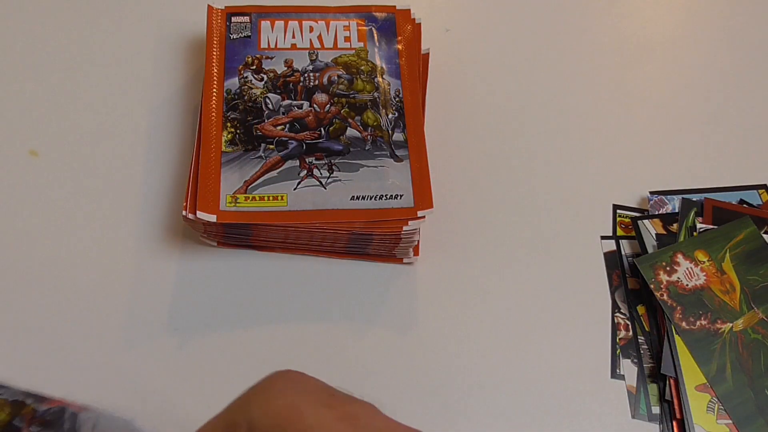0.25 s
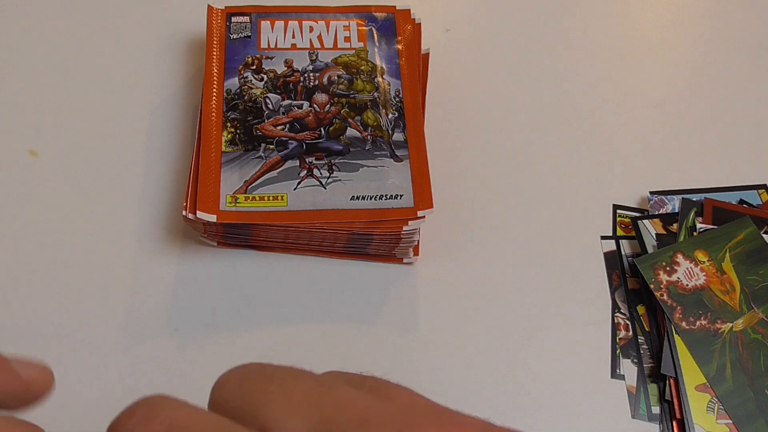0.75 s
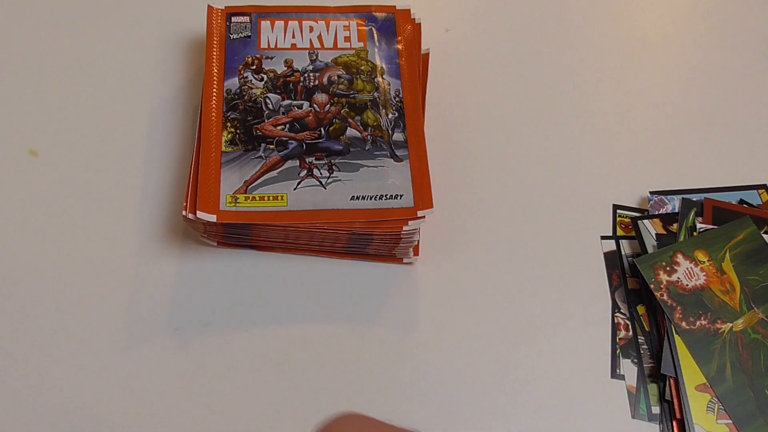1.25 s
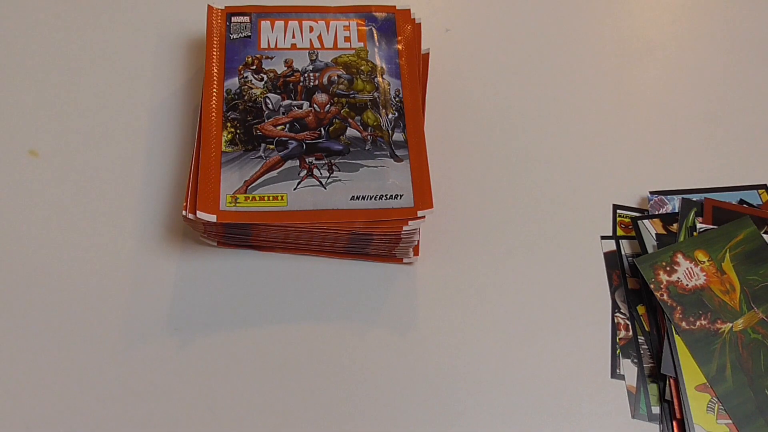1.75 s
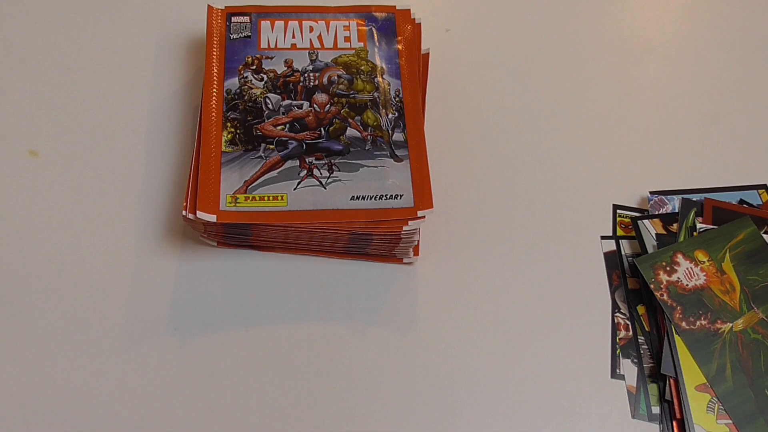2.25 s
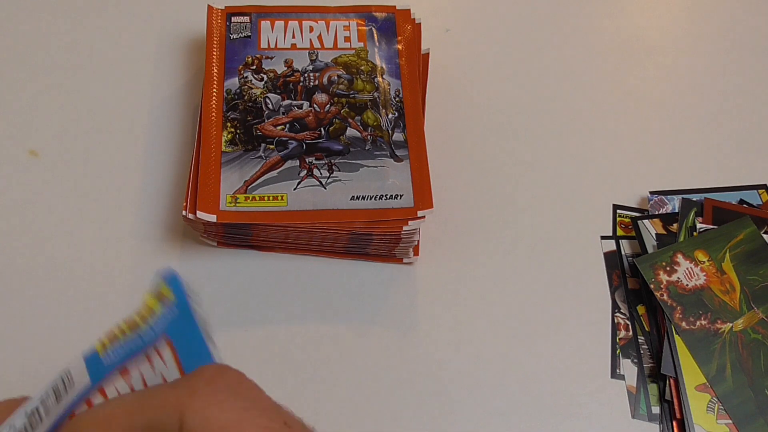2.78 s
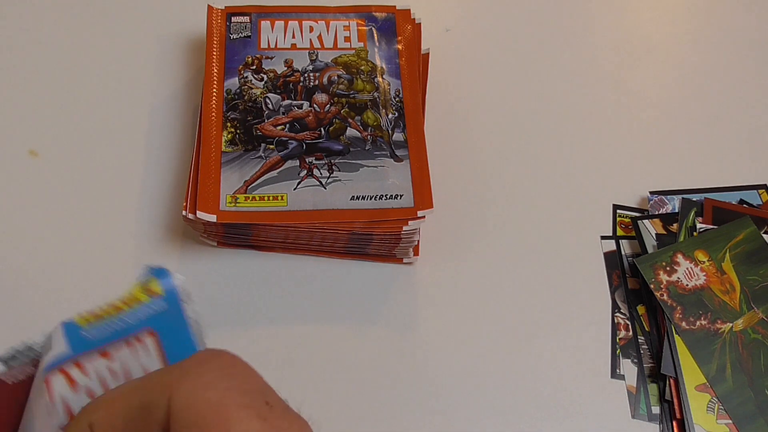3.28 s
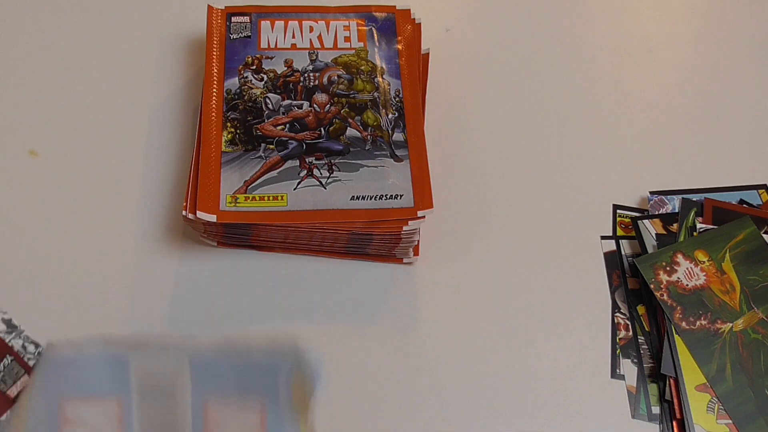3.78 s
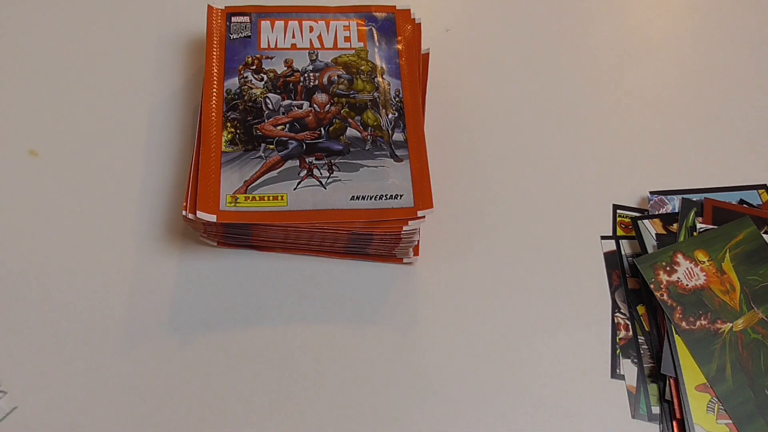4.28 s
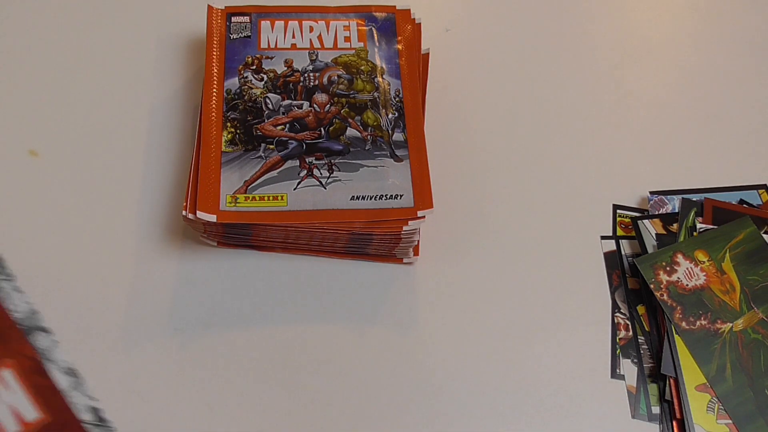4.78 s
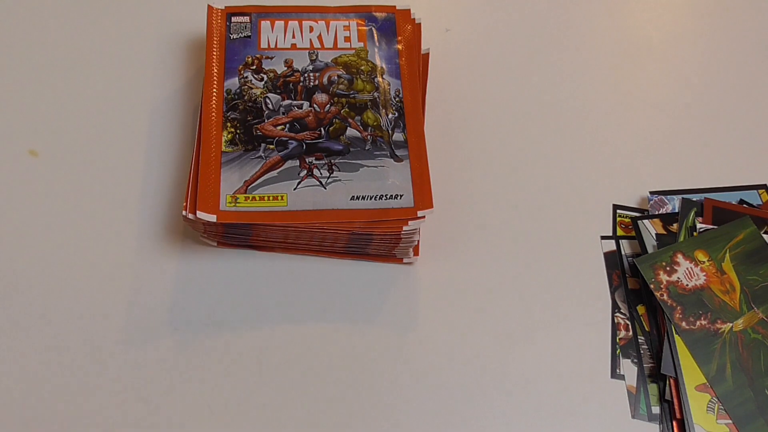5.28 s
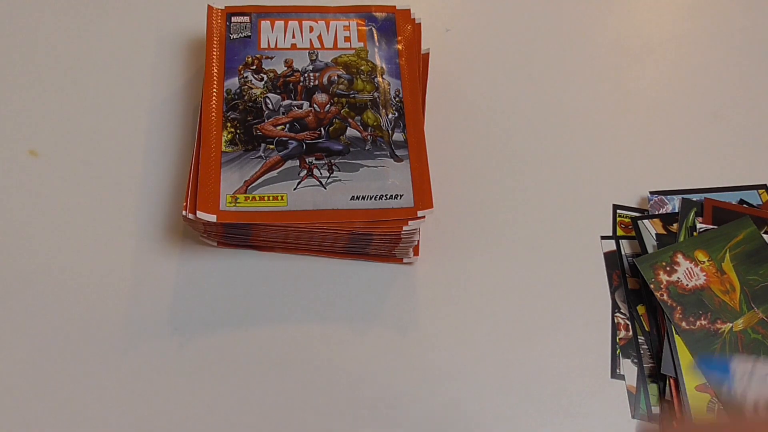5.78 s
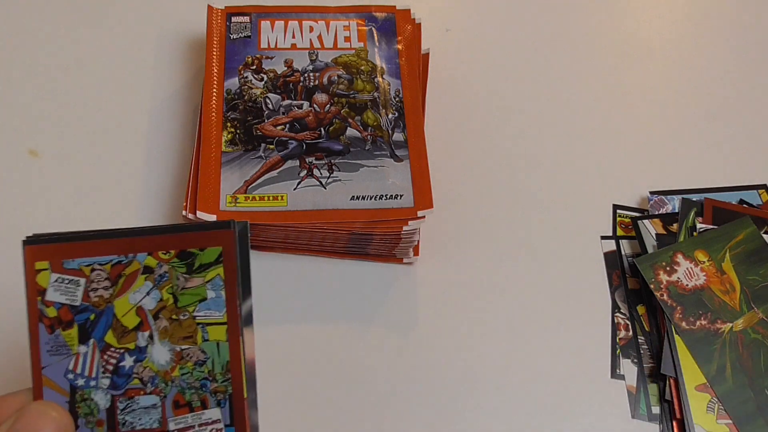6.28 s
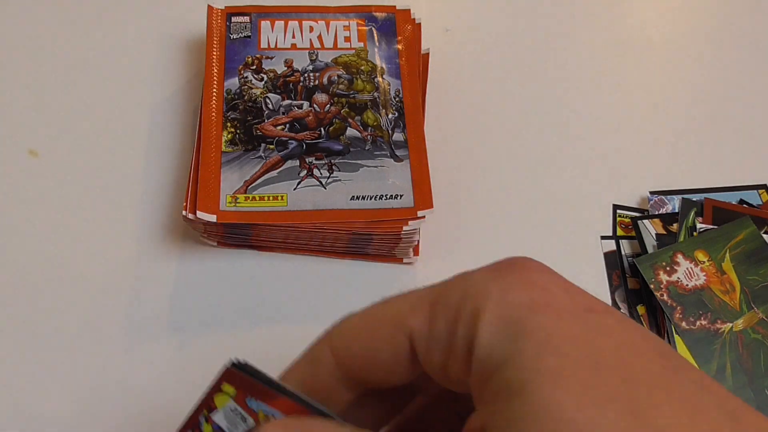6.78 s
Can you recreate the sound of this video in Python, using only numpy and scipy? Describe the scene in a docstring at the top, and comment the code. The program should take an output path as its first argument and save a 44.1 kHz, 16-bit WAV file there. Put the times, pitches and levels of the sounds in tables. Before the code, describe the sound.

Hands at a table open a small paper sticker packet: light rustles and ticks, a bright coarse tear, irregular crackling and small knocks, sharp snapping of the spread wrapper, sliding rubs, one brief stack slap, then dense quiet shuffling. Close stereo camera microphone, short reflection off the table, slight room echo, steady low hiss and rumble.

```python
"""At a table in a small, quiet room, a camera microphone just over the hands: a thin paper sticker packet is
picked up, its top torn off, pried open and unfolded; the stickers are pulled out and the stack is leafed.
Paper sounds as many tiny slips in three layers: fibres fizz, creases ring and the sheet flexes.
Single rips, pops and knocks snap out above them, with a slap of the stack, soft rubs and lone ticks.
Behind lie an echo off the table top, the room's diffuse echoes, and hiss, rumble and a faint hum."""
import sys
import numpy as np
from scipy import signal
from scipy.fft import rfft, irfft
from scipy.io import wavfile
from scipy.ndimage import uniform_filter1d

SR = 44100
rng = np.random.default_rng(int(sys.argv[2]) if len(sys.argv) > 2 else 0)


def log_audio(samples):
    """Write samples as a 16-bit WAV file to the path given in sys.argv[1]."""
    # one column per channel
    frames = np.atleast_2d(samples).T
    # limit to full scale, then quantise
    limited = np.clip(frames, -1, 1)
    pcm = np.round(limited * 32767).astype(np.int16)
    wavfile.write(sys.argv[1], SR, pcm)


N = 310772
FLEX_TOP_HZ, CREASE_TOP_HZ, TOP_HZ = 1700, 6200, 16000  # upper edges of sheet flex, creases and fibres
SNAP_APART = .33  # weight of the side in the noise of snaps and ticks


def undb(db):
    """Decibels to gain."""
    return 10 ** (np.asarray(db) / 20)


def unit(x):
    """Scale to rms 1."""
    return x / np.sqrt(np.mean(x ** 2) + 1e-20)


def decay(t, t60):
    """Exponential fade by 60 dB in t60 seconds."""
    return np.exp(-np.log(1000) * t / t60)


def band(x, lo, hi, order=2):
    """Causal band-pass."""
    sos = signal.butter(order, [lo, min(hi, .48 * SR)], "band", fs=SR, output="sos")
    return signal.sosfilt(sos, x + 1e-18)


def colour_db(colour, hz):
    """Read a spectrum on a log-frequency axis."""
    points, db = np.transpose(colour)
    return np.interp(np.log(hz), np.log(points), db)


def stereo_noise(size, apart):
    """Two noises that share their middle; apart is the weight of the side."""
    mid, side = rng.standard_normal((2, size))
    return unit(np.array([mid + apart * side, mid - apart * side]))


def panned(x, pan_db):
    """Lean a pair of channels to the left."""
    return x * np.array([undb(pan_db / 2), undb(-pan_db / 2)]).reshape(2, -1)


def add(out, s, x):
    """Mix x into out from time s on."""
    start = int(np.clip(s * SR, 0, N - 1))
    out[:, start:start + x.shape[1]] += x[:, :N - start]


def wander(size, rate):
    """Smooth chance with a spread near 1, from rate random knots a second."""
    knots = rng.standard_normal(size=2000)
    return 1.2 * np.interp(np.arange(size) * rate / SR, np.arange(len(knots)), knots)


def steady(x, hold_s=0.13):
    """Even out the power: the hand feeds in energy smoothly, however the slips share it."""
    hold = int(hold_s * SR) + 1
    power = uniform_filter1d(np.mean(x ** 2, axis=0), hold)
    return x / np.sqrt(uniform_filter1d(np.abs(power), hold) + 1e-20)


# Paper merely held stirs faintly. In order: flex, crease and fibre level in dB, before each action's trims.
HELD_PAPER = [-66, -73.5, -74.5]


def effort(action, t, rise_power=0.99, fade_power=1.1):
    """Levels of flex, crease and fibre: strokes swell and fade, adding in power over the stir of held paper."""
    power = np.outer(undb(HELD_PAPER), np.ones(len(t))) ** 2
    for start, rise, fade, db, fizz_db, sheet_db in action:
        swell = np.clip((t - start) / rise, 0, 1) ** rise_power
        # a fade power over 1 holds a moment, then lets go
        swell = swell * 10 ** (-(np.maximum(t - start - rise, 0) / fade) ** fade_power)
        power += np.outer(undb([db + sheet_db, db, db + fizz_db]), swell) ** 2
    return np.sqrt(power)


def crackle(action, colour, rate, spread_db, scatter_db, drift_db, apart, trims_db, pan_db):
    """Random slips (rate a second) of unequal size ring third-octave resonances, which shift as the paper bends."""
    start, rise, fade = np.transpose(action)[:3]
    t = np.arange(start[0], min(np.max(start + rise + 2 * fade), N / SR), 1 / SR)
    slips = np.flatnonzero(rng.random(len(t)) < rate / SR)
    sizes = undb(spread_db * np.minimum(rng.exponential(size=len(slips)), 5))
    sizes = sizes * rng.choice([-1, 1], len(slips))
    layers = np.zeros((3, 2, len(t)))  # flex, crease, fibre
    edges = np.geomspace(115, TOP_HZ, 22)
    for lo, hi in zip(edges, edges[1:]):
        hz = np.sqrt(lo * hi)
        sizes = -sizes  # neighbouring resonances swing in opposite phase
        share, facing = rng.standard_normal((2, len(slips)))
        bend = wander(len(t), rate=28)[slips]
        # every facet of the paper faces the two ports differently
        ports = 1 + apart * np.outer([1, -1], facing)
        pulses = np.zeros((2, len(t)))
        pulses[:, slips] = sizes * undb(scatter_db * share + drift_db * bend) * ports
        layer = np.searchsorted([FLEX_TOP_HZ, CREASE_TOP_HZ], hz)
        layers[layer] += undb(colour_db(colour, hz)) * band(pulses, lo, hi)
    levels = effort(action, t)
    sound = sum(undb(db) * level * steady(layer) for db, level, layer in zip(trims_db, levels, layers))
    out = np.zeros((2, N))
    add(out, start[0], panned(sound, pan_db))
    return out


# Pulls that tear the top off. Each row: start in seconds, rise in seconds, fade by 20 dB in seconds,
# crease level in dB, fibre fizz and sheet flex in dB over that; all levels before the trims.
TEARING_PULLS = [(1.18, 0.075, 0.17, -35, 8, -0.5), (1.295, 0.015, 0.22, -34, 11, -2.5),
                 (1.43, 0.019, 0.14, -36, 15.5, -7), (1.53, .05, 0.15, -38.5, 11, -1.5),
                 (1.611, 0.12, 0.038, -36.5, 7.5, 0.5)]
# Colour of the tear. Each row: frequency in Hz, density in dB per Hz relative within each layer.
TEARING_COLOUR = [(71, -49), (120, -18.5), (355, -14.5), (617, -5), (1010, -10), (1430, -10.5), (1720, -20),
                  (2290, -13.5), (2590, -27), (3450, -13), (5990, -13), (7500, 2.5), (11300, 7),
                  (14700, -7), (16000, -21)]


def tearing():
    """Tearing breaks fibres in a coarse crackle with a strong fizz."""
    return crackle(TEARING_PULLS, TEARING_COLOUR, rate=2400, spread_db=2.5, scatter_db=1.5, drift_db=2.0,
                   apart=0.38, trims_db=[0.5, 0.5, 1.5], pan_db=1.1)


# Tugs that spread the wrapper. Each row: start in seconds, rise in seconds, fade by 20 dB in seconds,
# crease level in dB, fibre fizz and sheet flex in dB over that; all levels before the trims.
UNFOLDING_TUGS = [(3.295, 0.022, .1, -43, 8, -11), (3.335, 0.014, 0.12, -34, -2, -11.5),
                  (3.41, 0.022, 0.1, -46.5, 10.5, -19), (3.478, 0.049, 0.19, -31.5, 4, -6.5),
                  (3.669, 0.014, 0.11, -34, 4.5, -5), (3.69, 0.032, .13, -37, 4.5, 2.5),
                  (3.78, .04, 0.043, -45.5, 2.5, 0)]
# Colour of the spread wrapper. Each row: frequency in Hz, density in dB per Hz relative within each layer.
UNFOLDING_COLOUR = [(71, -38), (120, -8.5), (261, -2.5), (580, -5), (839, -3.5), (1830, -9), (2150, -1.5),
                    (2590, -2.5), (3310, 1.5), (5410, 0.5), (6240, -12), (8310, 2.5), (12300, 3),
                    (14200, -15), (16000, -22)]


def unfolding():
    """Tugs on the folded wrapper make its creases slip."""
    return crackle(UNFOLDING_TUGS, UNFOLDING_COLOUR, rate=2200, spread_db=2.5, scatter_db=4.5, drift_db=2.5,
                   apart=0.39, trims_db=[1.5, 2, 3.0], pan_db=.8)


# The taut packet rings along. Each row: frequency in Hz, width in Hz, gain in dB.
TAUT_PACKET_MODES = [(686, 140, -10.5), (1340, 200, -8), (2220, 140, 2), (3330, 340, -5.5), (4640, 710, -4),
                     (7280, 580, 4.5)]


def packet(x, direct_db=-1.0):
    """Slips heard directly and through the resonances of the stretched packet."""
    out = undb(direct_db) * x
    for hz, width, db in TAUT_PACKET_MODES:
        out = out + undb(db) * band(x, hz - width / 2, hz + width / 2, order=1)
    return out


def catching(rate=110, depth_db=2.15):
    """The paper catches and lets go, so the level of the slips surges and sinks."""
    return unit(undb(depth_db * wander(N, rate)))


# Colour of the wrapper, bent or sliding. Each row: frequency in Hz, density in dB per Hz relative within each layer.
PAPER_COLOUR = [(71, -37), (120, -5.5), (445, 3), (483, 1), (670, 4), (892, -4.5), (1070, 0), (1720, -5),
                (2700, -6.5), (3450, -3), (5870, -4), (6910, -7), (10200, -6), (12500, -6.5), (16000, -34)]
# Bends that pry the packet open. Each row: start in seconds, rise in seconds, fade by 20 dB in seconds,
# crease level in dB, fibre fizz and sheet flex in dB over that; all levels before the trims.
PRYING_BENDS = [(1.75, 0.039, 0.3, -57, 6, -3), (1.87, 0.02, 0.26, -63, 12, 5),
                (2.022, .012, 0.048, -48, 5, -6), (2.05, 0.05, 0.049, -40, 10.5, -5.5),
                (2.13, 0.017, 0.25, -43, 9.5, -4), (2.34, 0.045, 0.092, -46.5, 0.5, 3),
                (2.49, 0.031, 0.1, -45, 2.5, -4.5), (2.665, 0.011, 0.23, -50.5, -2.5, 1),
                (2.77, .085, 0.093, -38, 1.5, -1.5), (2.91, 0.034, .2, -56.5, 6.5, -3),
                (3.06, 0.033, 0.14, -57.5, 3.5, 4), (3.205, 0.0075, 0.19, -55.5, 7.5, -4.5)]


def bending():
    """Bending crackles with fewer slips than sliding paper."""
    return crackle(PRYING_BENDS, PAPER_COLOUR, rate=3800, spread_db=2.5, scatter_db=3.5, drift_db=2.6,
                   apart=0.2, trims_db=[1.0, 0.5, 0.0], pan_db=0)


# Paper sliding on paper and skin. Each row: start in seconds, rise in seconds, fade by 20 dB in seconds,
# crease level in dB, fibre fizz and sheet flex in dB over that; all levels before the trims.
PAPER_SLIDES = [(0, 0.0069, 0.13, -56, 9.5, -0.5), (.08, 0.028, .03, -56, 12.5, 0),
                (.44, 0.048, 0.23, -61.5, 6.5, -1), (.78, 0.0073, 0.09, -52, 2, -2),
                (.945, 0.0073, 0.098, -56, 3, 4.5), (1.11, 0.049, 0.19, -55, 4.5, -4),
                (3.92, 0.029, 0.3, -46, 1, -1.5), (4.065, 0.0092, 0.044, -40, -0.5, 2.5),
                (4.18, 0.025, 0.23, -59, -15, 9.5), (4.316, 0.0087, 0.15, -41.5, 2, -2),
                (4.4, 0.049, 0.037, -45, 5.5, 0), (4.51, 0.025, 0.048, -45, 3.5, -2.5),
                (4.58, 0.02, 0.3, -56.5, 4, -0.5), (4.74, 0.015, 0.073, -57, 3, 0),
                (4.905, 0.042, 0.067, -37, -1.5, -9.5), (5.025, 0.04, 0.043, -50, 9, -1.5),
                (5.09, 0.032, .15, -59.5, 4, 4.5), (5.165, 0.031, 0.26, -50, 0.5, 1.5),
                (5.315, 0.0099, 0.22, -49.5, 6, -1.5), (6.76, .015, 0.18, -55.5, 3, 3.5),
                (6.84, 0.035, 0.21, -61.5, 7.5, 4.5), (6.95, 0.11, 0.08, -59.5, 4, -1)]


def sliding():
    """Sliding makes slips so dense that they hiss."""
    return crackle(PAPER_SLIDES, PAPER_COLOUR, rate=9000, spread_db=3.0, scatter_db=4, drift_db=2.1,
                   apart=0.37, trims_db=[1.0, 0.5, 0.5], pan_db=-0.7)


# Stickers pushed over the stack. Each row: start in seconds, rise in seconds, fade by 20 dB in seconds,
# crease level in dB, fibre fizz and sheet flex in dB over that; all levels before the trims.
LEAFING_PUSHES = [(5.772, 0.03, .04, -57.5, 15.5, 8.5), (5.813, 0.0075, 0.088, -32.5, 3.5, 1.5),
                  (5.87, 0.071, 0.14, -45.5, 5.5, 3.5), (6.04, 0.082, 0.19, -49.5, 7.5, -5),
                  (6.185, 0.056, .04, -52.5, 3, -1), (6.27, 0.057, .3, -52, 7.5, 4.5),
                  (6.45, 0.0075, 0.24, -55.5, 2.5, 1)]
# Colour of the stack. Each row: frequency in Hz, density in dB per Hz relative within each layer.
LEAFING_COLOUR = [(71, -35), (120, -7), (231, -9), (295, -10), (493, -6.5), (698, -1), (892, -8.5),
                  (1260, -3), (1680, -9), (5870, -4.5), (9400, 7), (13000, -7), (16000, -21)]


def leafing():
    """Stickers slide over each other in the densest slips."""
    return crackle(LEAFING_PUSHES, LEAFING_COLOUR, rate=11000, spread_db=3.0, scatter_db=3.0, drift_db=3.0,
                   apart=0.45, trims_db=[-5.0, 0.0, -1.5], pan_db=0.5)


def snap(db, t60, ring_hz, bright_db, sheet_hz, sheet_db, rise_s=0.00023, ring_width=0.31, ring_db=-3,
         crack_db=1.0, mode_db=-1, push_db=-3, sheet_t60_s=0.019, push_t60_s=0.022, push_top_hz=1250):
    """The paper buckles: a burst of slips rings one facet, and the whole sheet gives a short low knock."""
    t = np.arange(SR // 10) / SR
    # short pops have a sharp front; long ones are surges of fibres giving way
    front = 3 * np.exp(-t60 / .01) * decay(t, .003)
    envelope = (front + decay(t, t60)) * (1 - np.exp(-t / rise_s))
    burst = np.tanh(2 * stereo_noise(len(t), SNAP_APART)) * envelope
    crease = unit(band(burst, FLEX_TOP_HZ, CREASE_TOP_HZ))
    fibre = unit(band(-burst, CREASE_TOP_HZ, 12900))
    edge = unit(crease + undb(bright_db) * fibre)
    ring = unit(band(burst, ring_hz / (1 + ring_width), ring_hz * (1 + ring_width)))
    sign = 1 if ring_hz < CREASE_TOP_HZ else -1  # the ring swings with its own band
    crack = unit(edge + sign * undb(ring_db) * ring)
    # so small a sheet radiates no deep bass
    mode = unit(band(np.sin(2 * np.pi * sheet_hz * t) * decay(t, sheet_t60_s), 142, 3500))
    push = stereo_noise(len(t), SNAP_APART) * decay(t, push_t60_s)
    push = unit(band(push, 197, push_top_hz, order=3))
    sheet = undb(mode_db) * mode + undb(push_db) * push
    # levels refer to the energy as if packed into a hundredth of a second
    return (undb(db + crack_db) * crack + undb(sheet_db) * sheet) / np.sqrt(10)


# Bundles of fibres give way. Each row: time in seconds, level in dB before the trims in snap,
# brightness in dB of fibre over crease, t60 in seconds.
FIBRE_RIPS = [(0.028, -48, 24, .023), (0.1284, -44, 30, .018), (1.265, -26.5, 4, 0.015),
              (1.2862, -32, 9, .012), (1.39, -25, 21, 0.019), (1.441, -30, 4, 0.037),
              (1.455, -24, 14, 0.025), (1.491, -26.5, 25, 0.035), (1.5337, -22.5, 31, 0.039),
              (1.57, -25.5, 26, .07), (1.5874, -22, 14, .036), (2.0379, -24.5, 10.5, 0.02),
              (2.0985, -26, 22, 0.017), (2.1464, -32, 14, 0.014), (2.3558, -37.5, 18, 0.02),
              (3.2106, -40.5, 12, .045), (3.2969, -26, 8, 0.013), (3.3148, -25.5, 14, 0.0081),
              (3.341, -22.5, 12, 0.018), (3.482, -27, 0, 0.024), (3.6309, -26, 2, 0.043),
              (3.7452, -26.5, -7, .018), (6.4552, -43.5, 4, 0.032)]


def rips(ring_hz=10200, sheet_hz=752, sheet_db=-19, rise_s=0.0016, pan_db=1.0):
    """A bundle of fibres gives way in a surge; the sheet's knock is relative to it."""
    out = np.zeros((2, N))
    for s, db, bright_db, t60 in FIBRE_RIPS:
        rip = snap(db, t60, ring_hz, bright_db, sheet_hz, db + sheet_db, rise_s)
        add(out, s, panned(rip, pan_db))
    return out


# Creases pop through. Each row: time in seconds, crack level in dB, ring of the facet in Hz,
# sheet knock in dB; both levels before the trims in snap.
CREASE_POPS = [(.7789, -49, 6550, -62), (0.7856, -39.5, 3230, -40.5), (.949, -42, 3500, -43.5),
               (1.1243, -47.5, 4470, -68), (1.7886, -44, 7400, -63), (1.9685, -46, 6640, -55),
               (1.9817, -43.5, 10250, -60), (2.116, -35, 10800, -61), (2.2236, -30.5, 7100, -51),
               (2.3115, -40.5, 10300, -53), (2.3191, -47, 4570, -56), (2.4047, -32, 9000, -49),
               (2.5335, -42, 7800, -50), (2.5731, -44.5, 8000, -50), (2.6725, -46, 6970, -52),
               (2.7838, -40, 7100, -48), (2.9874, -44.5, 10400, -67), (3.3623, -23, 4300, -42),
               (3.374, -30, 4150, -58), (3.385, -32, 4000, -63), (3.4136, -35, 4900, -63),
               (3.4431, -37.5, 7500, -57), (3.5746, -33, 4730, -55), (3.591, -30.5, 4500, -55),
               (3.667, -32, 4760, -33), (3.7564, -26, 8160, -40), (3.8377, -37.5, 5440, -41),
               (3.9412, -41, 3000, -53), (3.9838, -28.5, 4930, -31.5), (4.0175, -40, 8550, -55),
               (4.0346, -26.5, 4520, -36), (4.0705, -33, 6200, -37.5), (4.2266, -45.5, 3430, -52),
               (4.243, -48, 2050, -50), (4.318, -43, 6000, -52), (4.4125, -37, 4060, -66),
               (4.4614, -26.5, 5400, -55), (4.866, -47, 10500, -65), (4.9133, -32, 3400, -38),
               (5.3247, -37.5, 4840, -56), (5.9653, -42.5, 7160, -51), (5.9893, -40.5, 9000, -66),
               (6.1782, -44.5, 8700, -58)]


def pops(t60_s=0.0086, sheet_hz=814, even_ring_hz=4440, bright_db_per_octave=10, pan_db=0.1):
    """A crease pops through: the smaller the facet, the higher and brighter its pop."""
    out = np.zeros((2, N))
    for s, db, ring_hz, sheet_db in CREASE_POPS:
        bright_db = bright_db_per_octave * np.log2(ring_hz / even_ring_hz)
        add(out, s, panned(snap(db, t60_s, ring_hz, bright_db, sheet_hz, sheet_db), pan_db))
    return out


# Fingers and stickers bump the packet. Each row: time in seconds, knock level in dB, sheet mode in Hz,
# crack level in dB; both levels before the trims in snap.
PACKET_KNOCKS = [(0.2847, -41.5, 1120, -58), (.2938, -45, 725, -62), (0.3767, -43, 1080, -52.5),
                 (2.373, -33.5, 784.4, -34.5), (2.385, -39.5, 356, -38), (2.4125, -41, 1210, -49),
                 (2.4494, -45, 370, -51), (2.684, -43.5, 383, -42.5), (2.86, -31.5, 627, -33.5),
                 (3.758, -31.5, 370, -30), (4.0073, -38, 657, -51), (4.0277, -26.5, 320, -30),
                 (4.2964, -46, 202, -48), (4.762, -47.5, 201, -50.5), (5.405, -46.5, 1090, -72),
                 (5.9649, -46.5, 199, -50), (6.3697, -45, 230, -43), (6.428, -38.5, 326, -46),
                 (6.8743, -45, 686, -53), (6.8908, -46, 1010, -44.5)]


def knocks(t60_s=0.026, ring_hz=8000, bright_db=-3, pan_db=1.0):
    """A bump sounds the sheet's low mode under a noisy crack."""
    out = np.zeros((2, N))
    for s, sheet_db, sheet_hz, db in PACKET_KNOCKS:
        add(out, s, panned(snap(db, t60_s, ring_hz, bright_db, sheet_hz, sheet_db), pan_db))
    return out


# Ring of the closing stack. Each row: frequency in Hz, level in dB before the slap's gain, t60 in seconds.
STACK_MODES = [(334, -40.5, 0.17), (668, -21.5, 0.068), (1140, -41, 0.21), (1215, -48, 0.28),
               (3500, -29, .06)]


def slap(at_s=5.817, rise_s=0.0052, gain_db=4):
    """The loose stickers close up into a stack, which rings briefly."""
    out, t = np.zeros((2, N)), np.arange(SR // 4) / SR
    ring = sum(undb(db) * np.sin(2 * np.pi * hz * t) * decay(t, t60) for hz, db, t60 in STACK_MODES)
    add(out, at_s, np.tile(undb(gain_db) * ring * (1 - np.exp(-t / rise_s)), (2, 1)))
    return out


# Skin rubs over table and paper. Each row: middle in seconds, half length in seconds,
# centre frequency in Hz, level at the middle in dB.
SKIN_RUBS = [(0.601, 0.41, 230, -59), (2.89, 0.073, 175, -48), (3.96, 0.013, 785, -40),
             (4.096, 0.055, 830, -45), (6.288, .04, 399, -52), (6.39, 0.071, 225, -57)]


def rubs(width=0.18):
    """Soft friction that swells and fades in one low resonance."""
    out = np.zeros((2, N))
    for s, half_s, hz, db in SKIN_RUBS:
        swell = np.hanning(int(2 * half_s * SR))
        grain = unit(band(stereo_noise(len(swell), .25), hz / (1 + width), hz * (1 + width)))
        add(out, s - half_s, undb(db) * swell * grain)
    return out


# While fingers shift on the paper. Each row: start in seconds, end in seconds.
FINGERING_SPANS = [(0, 1.2), (1.8, 3.3), (4.15, 5.45), (5.9, 6.55), (6.759, 7.04)]


def ticks(rate=12, floor_db=-53, spread_db=3, t60_s=0.018):
    """Tiny lone ticks of paper settling under the fingers, rate a second."""
    out, t = np.zeros((2, N)), np.arange(SR // 50) / SR
    for start, end in FINGERING_SPANS:
        for when, size in rng.random((int((end - start) * rate), 2)):
            tick = band(stereo_noise(len(t), SNAP_APART) * decay(t, t60_s), 1800, 15000)
            add(out, start + when * (end - start), undb(floor_db + spread_db * 2 * size) * tick)
    return out


def table_bounce(x, lag_s=0.000922, gain=0.22):
    """The table top throws the sound back, at a lag that moves with the hands (drawn as a slow wander)."""
    now = np.arange(N)
    lag = lag_s * SR * np.exp(0.3 * wander(N, rate=3))
    echo = np.array([np.interp(now - lag, now, channel) for channel in x])
    return (x + gain * echo) / np.hypot(1, gain)


def room(x, low_t60_s=0.27, high_t60_s=0.2, low_db=-11, high_db=-17, onset_s=0.0024):
    """Diffuse echoes of table and walls; the treble dies sooner."""
    t = np.arange(SR // 2) / SR
    response = 0
    for lo, hi, t60, db in [(100, FLEX_TOP_HZ, low_t60_s, low_db), (FLEX_TOP_HZ, TOP_HZ, high_t60_s, high_db)]:
        tail = rng.standard_normal((2, len(t))) * decay(t, t60) * (1 - np.exp(-t / onset_s))
        response = response + undb(db) * band(unit(tail), lo, hi) / np.sqrt(len(t))
    return signal.fftconvolve(x, response, axes=1)[:, :N]


# Colour of the quiet room. Each row: frequency in Hz, relative level in dB.
AIR_COLOUR = [(15, -45), (25, 5), (206, 3.5), (354, 1), (575, 2), (1100, -8.5), (1740, -42), (2000, -7.5),
              (2760, -31), (4490, -8), (5880, -46), (7310, -9), (9070, -9.5), (14400, -14), (16000, -32)]
# Its stereo width. Each row: frequency in Hz, side minus mid in dB before the side trim.
AIR_WIDTH = [(60, -14), (110, -3), (200, -1), (380, 2), (700, -1.5), (1290, 9), (2380, -1), (4400, 1),
             (8120, -37), (15000, -28)]
# Faint hum of the room. Each row: frequency in Hz, width in Hz, level in dB.
ROOM_HUM = [(94.2, 7.4, -71), (196.5, 28, -67), (275.3, 32, -68.5)]


def room_tone(db=-58, side_db=-1):
    """Steady hiss and diffuse rumble with a faint wavering hum, all filtered noise."""
    hz = np.maximum(np.arange(N // 2 + 1) * SR / N, 1)
    mid, side = rfft(rng.standard_normal((2, N))) * undb(colour_db(AIR_COLOUR, hz))
    side = side * undb(side_db + colour_db(AIR_WIDTH, hz))
    tone = undb(db) * unit(irfft(np.array([mid + side, mid - side]), N))
    drive = stereo_noise(N, apart=0.68)
    for f, width, hum_db in ROOM_HUM:
        tone = tone + undb(hum_db) * unit(band(drive, f - width / 2, f + width / 2))
    return tone


# Where the hands hold the paper, on top of each layer's own pan. Each row: time in seconds, left minus right in dB.
HAND_POSITION = [(0, 0.5), (1.2, 0.6), (1.6, 1), (2.1, -1), (2.6, -0.4), (3.4, 0.5), (4.1, 1), (4.6, 1.5),
                 (5.2, 1), (5.83, 1), (6.1, -3), (7.0, 1)]


def scene():
    """The hands' paper sounds move a little from side to side, over table, room echoes and room tone."""
    stick_slip = catching()
    paper = packet(stick_slip * (tearing() + unfolding()))
    paper += stick_slip * bending()
    paper += sliding() + leafing()
    paper += rips() + pops() + knocks()
    paper += slap() + rubs() + ticks()
    paper = panned(paper, np.interp(np.arange(N) / SR, *np.transpose(HAND_POSITION)))
    return table_bounce(paper) + room(paper) + room_tone()


# The microphone's two ports differ in colour. Each row: frequency in Hz, left minus right in dB.
PORT_COLOUR = [(100, 0), (500, -0.7), (1300, 1.5), (3000, 0.5), (6000, 0), (9000, -0.5), (11500, -2),
               (14000, -6)]


def record(dry, lead=0.2):
    """The camera's two ports differ in colour and phase (lead, radians); deep bass and the very top are cut."""
    hz = np.maximum(np.arange(N // 2 + 1) * SR / N, 1)
    phase = np.exp(.5j * lead * np.array([[1], [-1]]))
    ports = irfft(panned(rfft(dry), colour_db(PORT_COLOUR, hz)) * phase, N)
    top_cut = signal.ellip(10, .2, 80, TOP_HZ, fs=SR, output="sos")
    return signal.sosfilt(top_cut, band(ports, 43, SR / 2))


dry = scene()
out = record(dry)
log_audio(out)
```